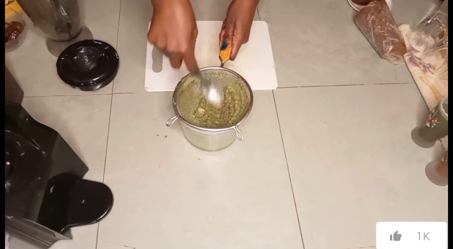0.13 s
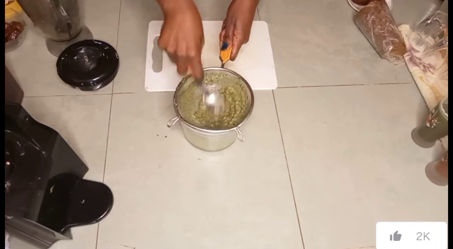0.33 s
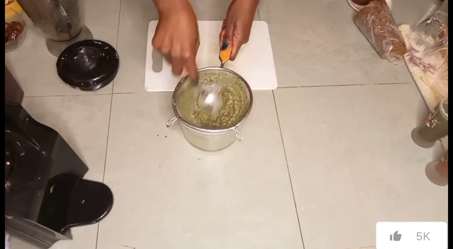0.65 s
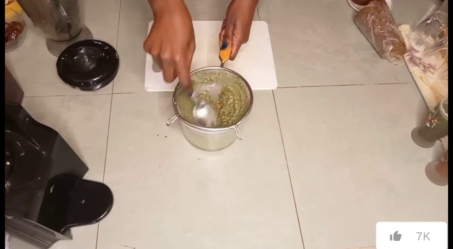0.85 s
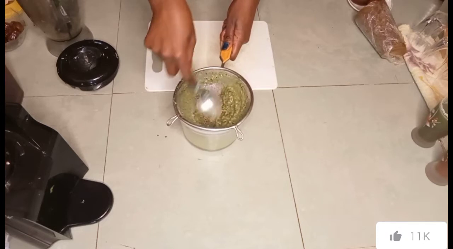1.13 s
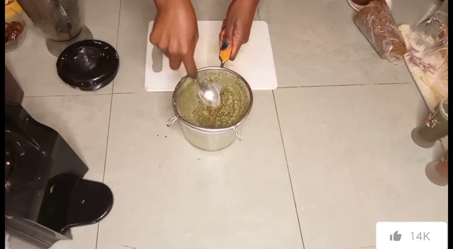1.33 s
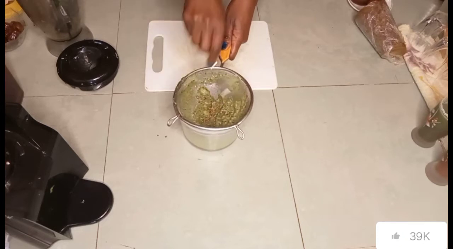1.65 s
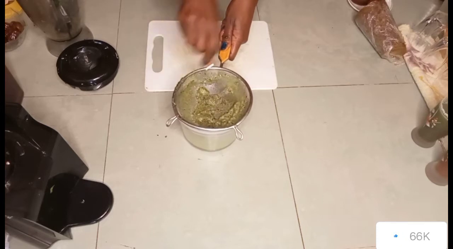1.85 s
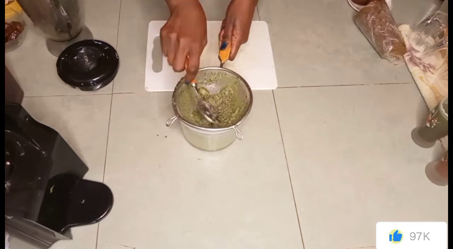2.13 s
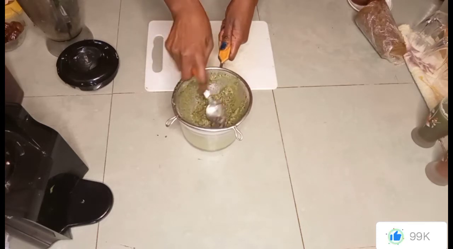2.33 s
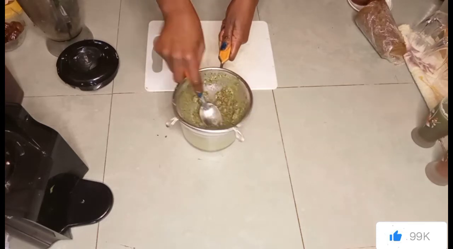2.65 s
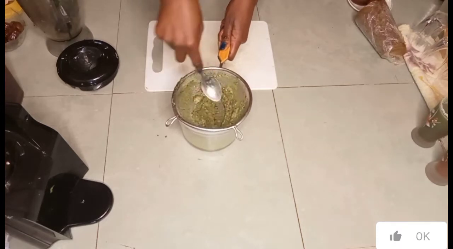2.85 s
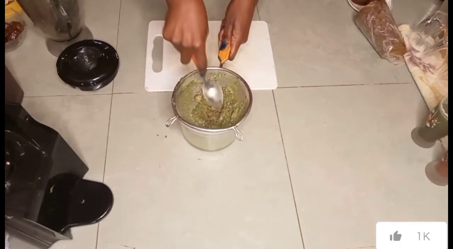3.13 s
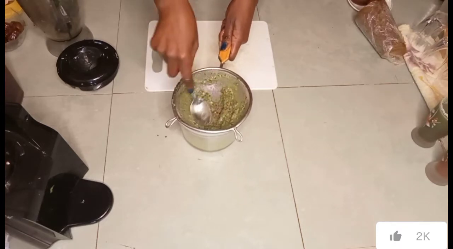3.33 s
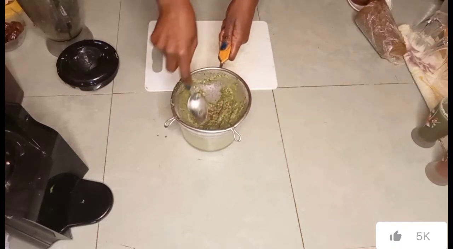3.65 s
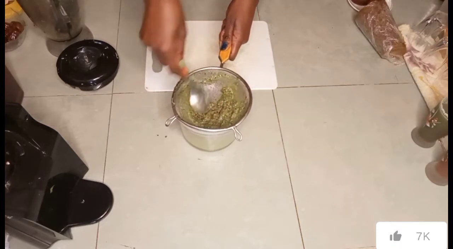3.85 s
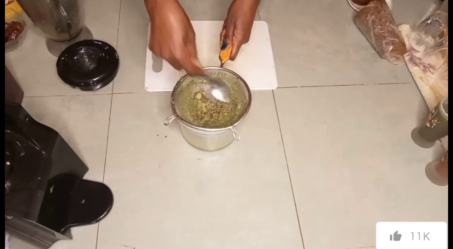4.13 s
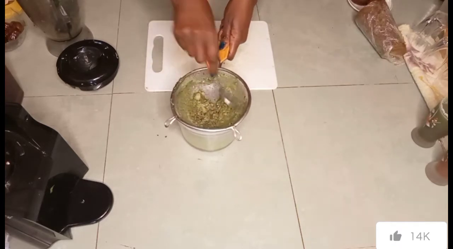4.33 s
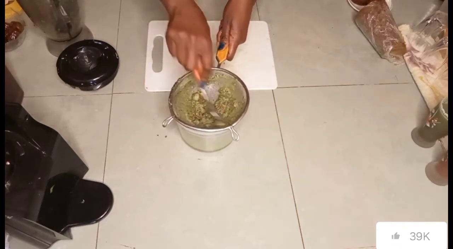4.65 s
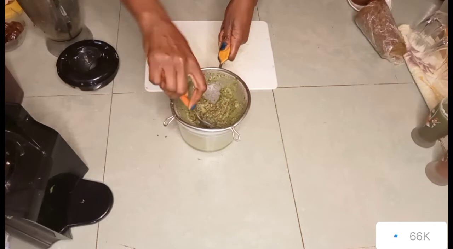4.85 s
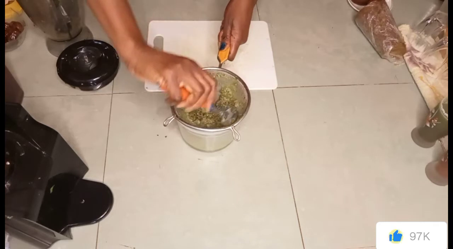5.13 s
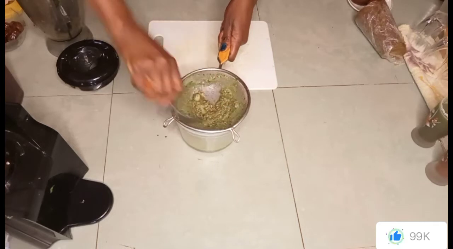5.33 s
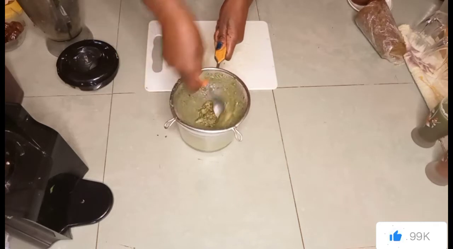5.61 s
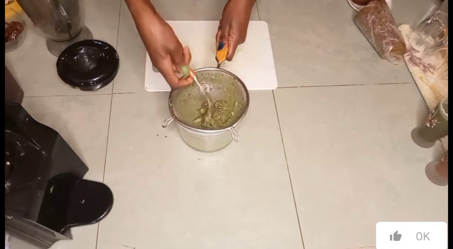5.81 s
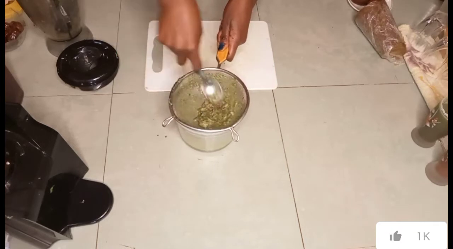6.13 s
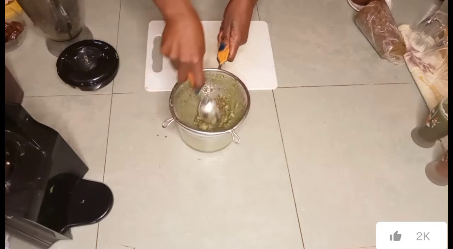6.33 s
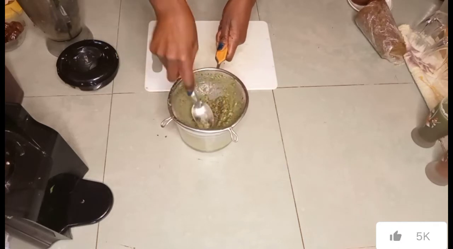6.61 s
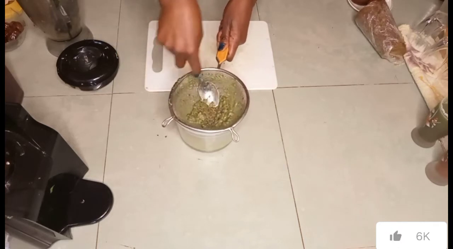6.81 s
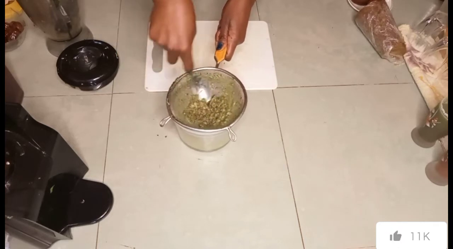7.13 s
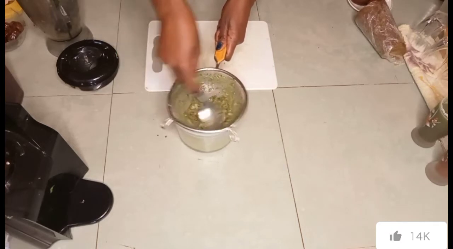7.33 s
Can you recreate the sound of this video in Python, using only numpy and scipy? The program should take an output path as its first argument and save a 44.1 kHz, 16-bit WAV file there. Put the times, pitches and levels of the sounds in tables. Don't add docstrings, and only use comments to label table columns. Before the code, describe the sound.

Close to a small microphone in a tiled kitchen, a steel spoon scrapes wet pulp through a wire sieve. About three brisk rasps a second, each with a brief metallic zip, rim ticks and soft thuds from the rocking jug. Midway comes a stronger flurry and one long back-and-forth sweep, then sparser, duller strokes with wet crackles, ending on a bright, loud scrape. A faint appliance drone lies underneath.

```python
import sys
import numpy as np
from scipy import signal
from scipy.fft import rfft, irfft, next_fast_len
from scipy.io import wavfile
from scipy.ndimage import uniform_filter1d, map_coordinates

SR = 44100
rng = np.random.default_rng(int(sys.argv[2]) if len(sys.argv) > 2 else 0)


def gain_from_db(level_db):
    decades = np.asarray(level_db, float) / 20
    return 10 ** decades


def wrap_up_sound(samples):
    columns = np.atleast_2d(samples).T
    tamed = np.clip(columns, -1, 1)
    steps = np.round(tamed * 32767).astype(np.int16)
    wavfile.write(sys.argv[1], SR, steps)


N = 329427

# (frequency [Hz], density [dB per Hz])
ROOM_FLOOR = [(18, -21.5), (30, -3), (185, -7.5), (281, 1), (472, -6), (511, -14), (629, -16.5),
              (1240, -10), (3320, -19.5), (5030, -30), (7400, -30), (15000, -42)]
ROOM_FLOOR_DB = -62
# (frequency [Hz], t60 [s])
ROOM_DECAY = [(100, 0.52), (500, 0.41), (2000, 0.25), (7000, 0.27), (14000, 0.21)]

# (frequency [Hz], width [Hz], level [dB])
BOARD_MODES = [(87.4, 20, 5.5), (101, 63, -6.5), (131, 11, -14)]
# (start [s], hold [s], level [dB], thud over the rock [dB])
ROCKING = [(0, 0.017, -37.5, 0), (0.089, 0.037, -37.5, 0), (.36, 0.1, -40.5, 0), (0.725, 0.065, -40.5, -3),
           (.955, 0.022, -52, 0), (1.072, 0.02, -42.5, 0), (1.267, 0.0087, -49, 0),
           (1.388, 0.023, -41.5, 0), (1.67, .02, -46.5, 0), (1.955, 0.016, -46.5, 0), (2.41, .05, -55, 0),
           (2.494, 0.023, -43.5, 0), (2.747, 0.028, -41.5, -3), (2.845, 0.044, -35.5, -3),
           (3.058, 0.015, -47, 0), (3.153, 0.032, -37, 0), (3.374, 0.034, -47, 0), (3.45, 0.021, -45, 0),
           (3.521, 0.021, -38, -3), (3.685, .02, -49, 0), (3.77, 0.035, -39, 0), (4.693, .025, -44, -9),
           (6.3, .12, -57, -12), (3.929, 0.042, -59.5, 0), (5.22, 0.026, -57, 0), (.62, .03, -53, 0),
           (4.886, 0.011, -50, -3), (5.42, 0.02, -47, -4), (6.075, 0.1, -43, 0), (6.19, 0.054, -40, -6),
           (6.47, 0.025, -35, -2), (6.727, 0.12, -44, 0), (7.008, 0.14, -41.5, -3), (7.36, 0.024, -36, 0)]
ROCK_RISE_S, ROCK_FALL_S = 0.00969, 0.19
SHAKE_DB, TREMOR_DB = -42.5, -70
# (frequency [Hz], width [Hz], level [dB])
THUD_MODES = [(182, 320, -6), (350, 74, -0.5)]
THUD_DB, THUD_T60_S = -1.5, 0.16

# (frequency [Hz], width [Hz], level [dB])
SIEVE_MODES = [(480, 38, 3), (790, 180, -2), (1160, 120, 1), (1340, 43, -8), (1589, 30, 0), (2200, 99, -1),
               (2620, 110, -7), (2910, 300, -5.5), (3350, 78, -10.5), (3540, 72, -1.5)]
# (frequency [Hz], width [Hz], level [dB])
BOWL_MODES = [(1160, 7, -3.5), (1418, 20, -1), (1640, 14, -0.5), (2390, 12, -8), (810, 14, -9)]
BOWL_DB = -8
# (time [s], frequency [Hz], level [dB], t60 [s])
RINGS = [(.36, 1470, -33, 0.45), (.42, 1130, -46, 0.38), (1.76, 1490, -37, 0.32), (1.83, 746, -46, 0.25),
         (1.79, 1130, -47, .22), (2.07, 1558, -32.5, 0.27), (2.08, 775, -36, 0.16), (2.17, 2350, -53, 0.23),
         (2.49, 1180, -41, .37), (2.5, 785, -45, 0.22), (4.19, 494, -39, 0.25), (4.24, 2410, -52, 0.12),
         (4.49, 506, -38, 0.25), (5.81, 1204, -44, 0.17), (3.23, 1150, -52, .4), (3.05, 500, -44, .2),
         (2.72, 430, -44, .15), (1.645, 850, -38, .2), (1.04, 950, -44, .3), (.7, 1050, -46, .4),
         (2.35, 490, -42, .25)]
RING_RISE_S = .012

# (time [s], peak [dB])
CRACKLES = [(0.74, -48), (0.8616, -47), (0.8815, -47), (1.2366, -56), (1.2626, -45), (1.485, -46),
            (2.6482, -53), (2.695, -57), (2.9633, -54), (2.9864, -53), (3.2914, -53), (3.3684, -46),
            (3.823, -36.5), (5.2011, -46), (5.216, -53), (6.458, -40), (6.2704, -51), (5.052, -60),
            (6.6117, -55), (6.7055, -41), (6.913, -47), (7.109, -40), (7.1754, -41.5), (7.2479, -49),
            (7.2645, -45.5)]
# (time [s], peak [dB], body [dB])
SPOON_TICKS = [(0.2815, -44, -1), (.623, -34, -1), (0.954, -27, -4), (1.2903, -17.5, -24), (1.6405, -26, -6),
               (1.9602, -35, -6), (2.719, -35.5, 7), (3.0465, -46, 11), (3.406, -38, 3), (3.676, -37, -2),
               (3.9785, -26, -9), (4.7519, -34, 7), (4.8113, -25, -9), (5.155, -43.5, -19), (6.0567, -33, -17),
               (6.35, -31, -7), (6.7225, -20, -12), (7.0085, -32, -10), (7.3357, -23.5, 4.5),
               (2.311, -35.5, 7.5), (4.408, -32, -13), (4.4145, -23, -10), (4.8167, -26, -6),
               (2.3202, -30, -4),
               (.089, -24, -17), (0.294, -22, -7), (.3145, -20, -10), (.3247, -20, -10), (0.4211, -14.5, -4),
         (.649, -20, -18), (0.7772, -28, 0), (2.7678, -20, -5), (2.7727, -18, -6), (2.8176, -27, -5),
         (2.855, -28, 0), (4.523, -20, -10), (6.3938, -30, -5), (3.0853, -22.5, -5), (3.164, -23, 3.5),
         (3.5184, -39, -8), (3.7086, -29.5, -4), (3.7742, -25, -1), (3.538, -36, 6), (5.7783, -26, -0.5),
         (6.137, -26, 5), (6.1894, -34.5, -1), (6.4025, -22, -3), (6.4782, -24.5, 6.5), (6.7446, -30, -5),
         (6.7946, -27, 2.5), (7.038, -25, -11), (7.0716, -18, 3), (7.3691, -18, 1.5)]

# (start [s], length [s], wires at start [Hz], at end [Hz], level [dB])
BUZZES = [(.005, 0.057, 503, 473, -31), (.315, 0.031, 1147, 1152, -24.5), (.64, 0.055, 772, 1045, -32),
          (0.97, 0.06, 800, 900, -33), (0.956, 0.068, 403, 524, -38), (1.685, 0.032, 306, 480, -32),
          (1.757, 0.042, 753, 734, -31), (2.025, 0.07, 785, 790, -25), (2.766, 0.033, 688, 635, -29.5),
          (3.091, 0.034, 489, 406, -34.5), (4.07, 0.078, 405.7, 625, -31.5), (4.469, 0.065, 736, 993, -32),
          (4.521, 0.02, 1326, 1293, -26.5), (5.418, 0.051, 1373, 1465, -28), (5.455, 0.056, 1096, 894, -28),
          (5.515, 0.029, 1327, 1173, -28), (5.629, 0.048, 791, 790, -28.5), (5.65, 0.087, 495, 517, -33),
          (5.68, 0.024, 1160, 1090, -27), (6.045, 0.041, 916, 920, -39.5), (6.393, 0.062, 422, 510, -36.5),
          (7.328, 0.041, 493, 476, -44), (4.407, .06, 480, 520, -40), (4.075, .05, 420, 520, -33)]
# (start [s], length [s], pitch at start [Hz], at
# end [Hz], level [dB])
SINGS = [(.32, 0.05, 1375, 1423, -32), (1.285, 0.071, 1115, 1160, -37), (1.705, 0.028, 756, 875, -19),
         (1.735, 0.019, 790, 793, -22), (2.003, 0.043, 367, 746, -31.5), (2.316, 0.035, 503, 466, -28.5),
         (2.436, 0.076, 1160, 1178, -33.5), (2.439, 0.021, 2620, 2680, -27), (2.82, 0.1, 823, 951, -36),
         (3.993, 0.074, 331, 415, -33), (4.03, 0.072, 657, 927, -26.5), (4.047, 0.033, 1240, 1340, -23),
         (4.098, 0.032, 2676, 2810, -20.5), (4.14, 0.067, 500, 467, -29), (4.425, 0.055, 506, 497, -26),
         (4.81, 0.056, 871, 874, -34.5), (5.24, 0.05, 800, 850, -41), (5.37, 0.057, 480, 438, -31),
         (5.483, 0.061, 1563, 1690, -27.5), (5.773, 0.041, 1267, 1087, -29), (5.988, 0.04, 498, 520, -58),
         (7.369, 0.058, 392, 630, -33.5), (7.408, 0.047, 2670, 2750, -24.5), (4.47, 0.023, 2220, 2250, -24),
         (4.479, 0.035, 2440, 2680, -27), (4.503, .025, 1956, 2080, -28.5), (4.527, .025, 2260, 2080, -27),
         (4.064, 0.019, 2590, 2730, -29), (4.085, 0.018, 2110, 2200, -26), (5.695, 0.037, 559, 326, -29.5),
         (5.466, 0.033, 716, 684, -34.5), (5.384, .025, 877, 944, -29), (0.314, 0.028, 3350, 3250, -19),
         (5.612, 0.034, 415, 380, -33.5), (5.781, 0.043, 480, 395, -32.5),
         (.65, 0.026, 2080, 2170, -31.5), (.958, 0.04, 3400, 3300, -30), (.995, 0.019, 2600, 3000, -32.5),
           (1.705, 0.028, 2270, 2600, -29), (1.705, .03, 1450, 1700, -33), (4.045, .04, 3500, 3100, -28),
           (4.485, .03, 3300, 3600, -28), (4.515, .02, 3000, 2700, -28), (5.33, .04, 2600, 2300, -34),
           (5.68, .035, 3200, 3450, -27), (5.465, .03, 3300, 3250, -28), (1.7, 0.04, 3000, 3500, -32.5),
           (2.035, 0.031, 3700, 3230, -28), (4.54, .07, 380, 340, -39), (2.86, .05, 430, 450, -37),
           (4.82, 0.03, 2700, 2900, -33), (5.66, 0.048, 1650, 2100, -27), (5.695, .028, 1400, 1300, -30),
           (5.485, .03, 2950, 2850, -28), (4.14, .03, 2530, 2900, -35), (.33, 0.028, 2700, 2900, -23.5)]
BUZZ_STEP_DB, SING_STEP_DB = -4, -12.5

# (frequency [Hz], density [dB per Hz])
GRIT_COLOUR = [(90, -50), (200, -14), (400, -5.5), (1100, -0.5), (1900, -2.5), (3300, -2), (3900, -10.5),
               (5000, -25.5), (6300, -18.5), (7200, -9), (8300, -18), (10000, -28.5), (12500, -31),
               (15500, -26)]
# (start [s], rise [s], hold [s], fall [s], peak [dB])
STROKES = [(0, 0.00038, 0.0022, 0.12, -17.5), (0.308, 0.011, 0.014, 0.11, -18),
           (0.627, 0.031, 0.0026, 0.091, -24), (0.951, 0.022, 0.046, 0.06, -25.5),
           (1.28, 0.014, 0.026, 0.055, -20), (1.682, 0.031, 0.0027, 0.1, -16.5),
           (1.965, 0.056, 0.033, 0.14, -21.5), (2.309, 0.01, 0.014, 0.17, -30.5),
           (2.395, 0.026, 0.051, 0.13, -24.5), (2.758, 0.015, .003, 0.086, -20),
           (2.796, 0.012, 0.094, 0.039, -35), (3.082, 0.017, .005, 0.19, -33),
           (3.4, 0.0041, 0.018, 0.04, -33.5), (3.719, 0.0086, 0.013, 0.052, -36.5),
           (3.985, 0.075, 0.08, 0.13, -19), (4.404, 0.0085, 0.022, 0.072, -25),
           (4.42, 0.043, 0.066, 0.2, -21), (4.811, 0.012, 0.021, 0.12, -25),
           (6.051, 0.005, 0.024, 0.07, -28), (6.087, .005, .022, .11, -29),
           (6.395, 0.0056, 0.015, 0.2, -31), (6.717, 0.0054, 0.015, 0.084, -29.5),
           (7.005, 0.0071, 0.0044, 0.083, -33.5), (7.363, 0.044, 0.014, 0.45, -16)]
# (time [s], pressure [dB], body [dB])
SWEEP = [
    [(5.19, -72, -68), (5.245, -42.5, -36), (5.27, -32.5, -34), (5.318, -29, -39.5), (5.372, -31, -36),
     (5.415, -26, -31.5), (5.436, -21, -45), (5.532, -19.5, -50), (5.548, -24, -36.5)],
    [(5.576, -28, -32), (5.62, -25.5, -31.5), (5.666, -22.5, -30), (5.684, -23.5, -39), (5.714, -22.5, -29),
     (5.73, -43, -23), (5.76, -47, -38)],
]
# (start [s], fall [s], peak [dB], body over grit [dB])
RUBS = [(0.086, 0.097, -31.5, 7.5), (0.417, 0.059, -36.5, 14), (0.771, 0.044, -35.5, 2.5),
        (1.638, 0.083, -29.5, 1.5), (1.757, 0.11, -22, -15), (1.958, 0.1, -32.5, 1),
        (2.719, 0.14, -44.5, 7), (3.046, 0.082, -37.5, -14), (3.161, 0.081, -35, 10),
        (3.516, 0.073, -34, 4.5), (3.674, 0.025, -45, 11), (3.775, 0.1, -43, 11.5),
        (3.976, 0.17, -36.5, 5.5), (4.751, 0.04, -42, 5.5), (6.189, 0.073, -46.5, 13),
        (6.348, 0.14, -45, 6), (6.477, 0.19, -51.5, 7), (6.793, 0.074, -37, 11), (7.068, 0.19, -38, 5),
        (7.327, 0.061, -29.5, -1.5), (0.279, 0.075, -40, 6), (0.615, .07, -44, 10)]
# (start [s], rise [s], hold [s], fall [s], peak [dB])
MUFFLED = [
    (5.755, 0.016, 0.024, 0.07, -22),
    (5.81, .01, 0.025, .12, -44),
]
# (start [s], rise [s], hold [s], fall [s], peak [dB])
SLIDES = [(.35, .01, .05, .1, -53), (.69, .02, 0.048, 0.09, -47), (1.02, .02, 0.037, .1, -51),
          (2.815, .005, 0.074, .05, -50), (3.1, 0.017, .04, .1, -50), (3.18, 0.017, 0.04, 0.055, -49.5),
          (3.26, 0.024, .03, .1, -59), (3.362, .003, 0.026, 0.061, -53), (3.43, .02, .05, .1, -54),
          (3.53, .01, 0.032, .06, -53), (3.73, 0.011, 0.024, .06, -51), (3.79, 0.018, .03, .08, -55),
          (6.035, .003, 0.0088, .05, -54), (6.088, 0.0035, 0.018, 0.069, -38),
          (6.2, 0.016, 0.028, 0.063, -54), (6.42, .02, .05, .08, -44), (4.52, 0.0037, .012, 0.07, -32),
          (6.75, 0.022, 0.046, 0.11, -53), (7.09, 0.018, 0.045, 0.12, -53)]
RISE_DB, FALL_DB = 23.5, 47
RUB_RISE_S = .002
TRAIL_DB, TRAIL_DB_PER_S = -29.5, 149
BODY_DB, BODY_FOLLOWS, BODY_PIVOT_DB = -3.5, 0.45, -24
WIRES_HZ, WIRES_PER_DB = 900, .025
WIRE_SCATTER, WIRE_SHARE = .2, .36


def unit(x):
    return x / np.sqrt(np.mean(x ** 2) + 1e-20)


def along(points, hz):
    f, v = np.transpose(points)
    return np.interp(np.log(hz + 1), np.log(f + 1), v)


def wobble(rate):
    return map_coordinates(rng.standard_normal(int(N * rate / SR) + 4), [np.arange(N) * rate / SR])


def filtered(x, response):
    m = 2 * next_fast_len(N // 2 + SR // 4)
    return irfft(rfft(x, m) * response(np.fft.rfftfreq(m, 1 / SR)), m)[:N]


def resonances(modes, hz):
    return sum(gain_from_db(db) * 1j * hz * w / (c * c - hz * hz + 1j * hz * w) for c, w, db in modes)


def causal(points, hz, size=8192):
    grid = np.fft.rfftfreq(size, 1 / SR)
    cepstrum = irfft(np.log(np.maximum(gain_from_db(along(points, grid)), 1e-4)))
    cepstrum[1:size // 2] *= 2
    cepstrum[size // 2 + 1:] = 0
    return np.exp(np.interp(hz, grid, rfft(cepstrum)))


def steel_gain(ring_db, tilt):
    def response(hz):
        shape = causal(GRIT_COLOUR, hz) * (1 + gain_from_db(ring_db) * resonances(SIEVE_MODES, hz))
        shape = shape * (1 + 1j * hz / 500) ** tilt
        return shape / np.sqrt(np.mean(abs(shape) ** 2))
    return response


def push_db(start, rise, hold, fall, db):
    on = slice(int(start * SR), min(N, int((start + rise + hold + .45) * SR)))
    t = np.arange(on.start, on.stop) / SR - start
    after = np.maximum(t - rise - hold, 0)
    drop = np.maximum(-FALL_DB * after / fall, TRAIL_DB - TRAIL_DB_PER_S * after)
    return on, db - RISE_DB * np.clip(1 - t / rise, 0, 1) + drop


def gain_curve(rows):
    power = np.zeros(N)
    for row in rows:
        on, level = push_db(*row)
        power[on] += gain_from_db(2 * level)
    return np.sqrt(power)


def fade(level, below_db=30):
    return 2 * np.minimum(level - level.max() + below_db, 0)


def stroke_controls():
    grit, body = np.zeros(N), np.zeros(N)
    s, db, body_db = np.transpose([row for leg in SWEEP for row in leg])
    sweep = slice(int(s[0] * SR), int(s[-1] * SR))
    t = np.arange(sweep.start, sweep.stop) / SR
    grit[sweep] = gain_from_db(2 * np.interp(t, s, db + 2.5))
    body[sweep] = gain_from_db(2 * np.interp(t, s, body_db + 4.0))
    for row in STROKES:
        on, level = push_db(*row)
        grit[on] += gain_from_db(2 * level)
        body_level = BODY_PIVOT_DB + BODY_DB + BODY_FOLLOWS * (level - BODY_PIVOT_DB)
        body[on] += gain_from_db(2 * body_level + fade(level))
    for start, fall, peak_db, over_db in RUBS:
        on, level = push_db(start, RUB_RISE_S, 0, fall, peak_db)
        grit[on] += gain_from_db(2 * level)
        body_level = peak_db + over_db + BODY_FOLLOWS * (level - peak_db)
        body[on] += gain_from_db(2 * body_level + fade(level))
    return np.sqrt(grit), np.sqrt(body)


def hum():
    def colour(hz):
        drone = resonances([(237.0, 13, 14), (42, 15, 14)], hz)
        return gain_from_db(along(ROOM_FLOOR, hz)) * (1 + drone)
    noise = unit(filtered(rng.standard_normal(N), colour))
    return gain_from_db(ROOM_FLOOR_DB + 1.5 + 2.2 * wobble(20)) * noise


def kitchen(x, count=4):
    out, turn = np.zeros(N), np.arange(N) / SR / .33
    for k in range(count):
        hz, t, z = signal.stft(rng.standard_normal(SR // 2), SR, nperseg=256)
        decay = gain_from_db(-60 * t / along(ROOM_DECAY, hz)[:, None])
        tail = signal.istft(z * decay, SR, nperseg=256)[1]
        share = np.clip(1 - abs((turn - k + count / 2) % count - count / 2), 0, 1)
        delayed = np.pad(x * share, (300, 0))
        out += signal.oaconvolve(delayed, tail / np.linalg.norm(tail))[:N]
    return out


def rocking():
    power = gain_from_db(2 * SHAKE_DB) * stroke_controls()[0] ** 2 + gain_from_db(2 * (TREMOR_DB + 3.5 * wobble(14)))
    for start, hold, db, _ in ROCKING:
        first = int(start * SR)
        t = np.arange(min(N - first, SR // 2)) / SR
        after = np.maximum(t - ROCK_RISE_S - hold, 0)
        swing = np.clip(t / ROCK_RISE_S, 0, 1) * gain_from_db(db - FALL_DB * after / ROCK_FALL_S)
        power[first:][:len(t)] += swing ** 2
    ring = unit(filtered(rng.standard_normal(N),
                         lambda hz: resonances(BOARD_MODES, hz) * resonances([(94.0, 104, 0)], hz)))
    steady = ring / (abs(signal.hilbert(ring)) + 0.29)
    return np.sqrt(power) * unit(steady)


def thuds():
    bumps, t = np.zeros(N + SR), np.arange(SR // 8) / SR
    for start, hold, db, thud_db in ROCKING:
        bump = gain_from_db(db + thud_db - 60 * t / THUD_T60_S) * rng.standard_normal(len(t))
        bumps[round((start + ROCK_RISE_S / 2) * SR):][:len(t)] += bump
    foot = filtered(bumps[:N], lambda hz: resonances(THUD_MODES, hz) * resonances([(250, 410, 0)], hz))
    return gain_from_db(THUD_DB + 22.5) * foot


def rings():
    out, t = np.zeros(N + SR), np.arange(SR // 2) / SR
    shake = np.pad([wobble(60), wobble(40)], [(0, 0), (0, SR)])
    for s, hz, db, t60 in RINGS:
        first = round(s * SR)
        drift, flutter = shake[:, first:][:, :len(t)]
        fading = gain_from_db(db - 60 * t / t60 + 6 * flutter - 3) * (1 - np.exp(-t / RING_RISE_S))
        out[first:][:len(t)] += fading * np.sin(2 * np.pi * hz * t + .9 * drift)
    return out[:N]


def crackles():
    crack, t = np.zeros(N + SR), np.arange(SR // 20) / SR
    luck = np.minimum(rng.standard_normal(300), 2)
    crack[rng.integers(0, N, size=300)] += gain_from_db(-56.0 + 4.5 * luck)
    for s, db in CRACKLES:
        crack[round(s * SR):][:len(t)] += gain_from_db(db - 8.5 - 60 * t / 0.058) * rng.standard_normal(len(t))
    return filtered(crack[:N], steel_gain(ring_db=-7.0, tilt=0.28))


def ticks():
    crack, knock, t = np.zeros(N + SR), np.zeros(N + SR), np.arange(SR // 20) / SR
    rise = 1 - np.exp(-t / 0.00025)
    for s, db, body_db in SPOON_TICKS:
        first = round(s * SR)
        a, b = rng.standard_normal((2, len(t)))
        decay = gain_from_db(db - 7.5 - 60 * t / 0.049) + gain_from_db(db - 10.5 - 60 * t / 0.0038)
        crack[first:][:len(t)] += decay * a * rise
        knock[first:][:len(t)] += gain_from_db(db + body_db - 10.5 - 60 * t / 0.063) * b * rise
    return (filtered(crack[:N], steel_gain(ring_db=-7.0, tilt=0.28))
            + filtered(knock[:N], steel_gain(ring_db=-25, tilt=-3.0)))


def whirr(waver=.03, flutter_db=3., count=6):
    out = np.zeros(N + SR)
    unsteady = np.pad(1 + waver * wobble(150), (0, SR), constant_values=1)
    tones = [(*row, BUZZ_STEP_DB) for row in BUZZES] + [(*row, SING_STEP_DB) for row in SINGS]
    for s, length, from_hz, to_hz, db, step_db in tones:
        start, u = round(s * SR), np.linspace(0, 1, num=round(length * SR))
        pitch = (from_hz + (to_hz - from_hz) * u) * unsteady[start:][:len(u)]
        phase = 2 * np.pi * np.cumsum(pitch) / SR
        tone = np.zeros(len(u))
        for k, (a, b) in enumerate(rng.uniform(-1.19, 1, (count, 2))):
            overtone_db = step_db * k + 0.79 * a * (k > 0)
            tone += gain_from_db(overtone_db) * np.sin((k + 1) * phase + np.pi * b)
        swell = np.maximum(np.sin(np.pi * u ** 0.81), 0)
        out[start:][:len(u)] += gain_from_db(db + 1.0) * swell * tone
    flutter = gain_from_db(flutter_db * np.clip(wobble(110), -3, 1))
    return filtered(out[:N] * flutter, lambda hz: 1 / (1 + (hz / 3450) ** 16))


def clumpy(patchy_db, bins, frames):
    z = signal.stft(rng.standard_normal(N + 256), nperseg=256, noverlap=192)[2]
    field = uniform_filter1d(uniform_filter1d(rng.standard_normal(z.shape), bins, 0), frames, 1)
    return unit(signal.istft(z * gain_from_db(patchy_db * unit(field)), nperseg=256, noverlap=192)[1][:N])


def wires(grit):
    level_db = 20 * np.log10(grit + 1e-4) + 20
    passed = np.cumsum(WIRES_HZ * np.exp(WIRES_PER_DB * level_db + .15 * wobble(25))) / SR
    k = np.arange(1, 8000)
    luck = rng.standard_normal((len(k), 2))
    at = np.searchsorted(passed, k + WIRE_SCATTER * luck[:, 0])
    return unit(np.bincount(at, gain_from_db(1.5 * luck[:, 1]), N + 1)[:N])


def scrape():
    grit, body = stroke_controls()
    lumps_db = .5 * wobble(60) + 1.2 * wobble(300) + 1.2 * wobble(1800)
    hiss = clumpy(3.3, bins=2, frames=10) * gain_from_db(lumps_db)
    rasp = np.sqrt(1 - WIRE_SHARE ** 2) * hiss + WIRE_SHARE * wires(grit)
    rush = clumpy(3.5, bins=2, frames=10)
    return (filtered(gain_from_db(-5.0) * grit * rasp, steel_gain(ring_db=-5.0, tilt=0.48))
            + filtered(gain_from_db(-9.5) * body * rush, steel_gain(ring_db=-3.5, tilt=-1.38))
            + filtered(gain_from_db(-4.5) * gain_curve(MUFFLED) * hiss, steel_gain(ring_db=-4.0, tilt=-0.12))
            + filtered(gain_from_db(-9.0) * gain_curve(SLIDES) * hiss[::-1], steel_gain(ring_db=-11.5, tilt=0.7)))


def scene():
    rasp, tone = scrape() + ticks() + crackles(), whirr()
    bowl = gain_from_db(BOWL_DB) * filtered(tone + rasp, lambda hz: resonances(BOWL_MODES, hz))
    room = gain_from_db(-8.5) * kitchen(rasp + gain_from_db(-5) * tone)
    return (hum() + room + rocking() + thuds() + rings() + bowl + tone + rasp)[None]


def band_limit(x):
    return signal.sosfilt(signal.butter(12, 16630, fs=SR, output="sos"), x)


def record(dry):
    def microphone(hz):
        top = gain_from_db(-58 * np.clip((hz - 15500) / 120 + .2, 0, 1))
        return top * (gain_from_db(-18.5) + 1 / (1 + (74 / (hz + 1)) ** 14))
    return band_limit(filtered(dry[0], microphone)[None])


dry = scene()
out = record(dry)
wrap_up_sound(out)
```